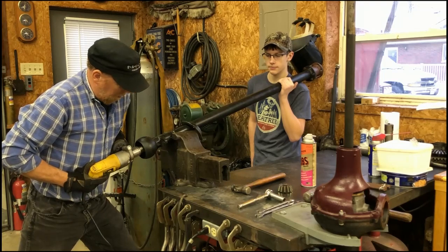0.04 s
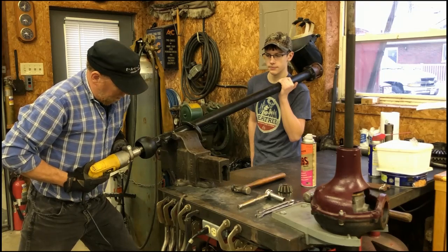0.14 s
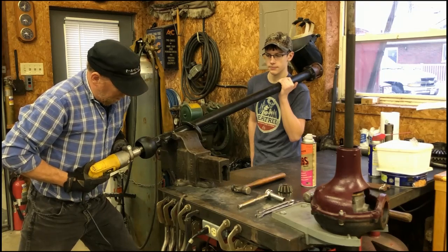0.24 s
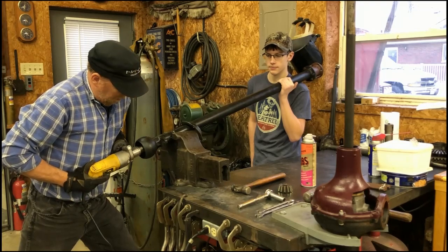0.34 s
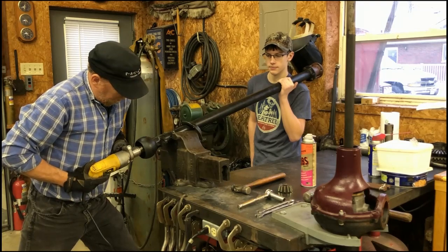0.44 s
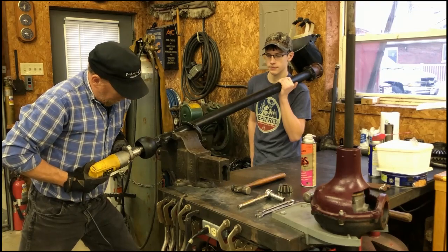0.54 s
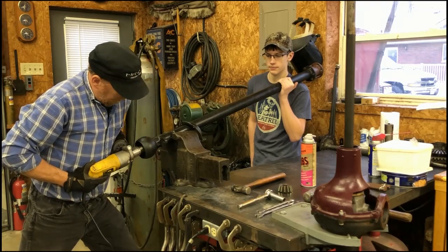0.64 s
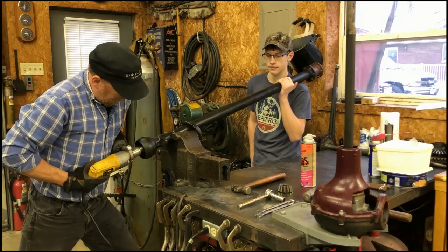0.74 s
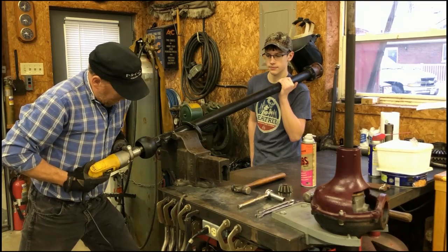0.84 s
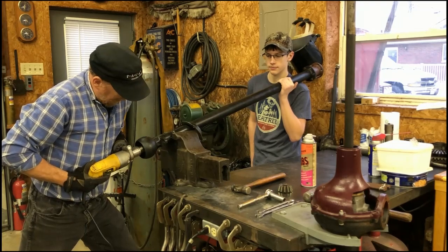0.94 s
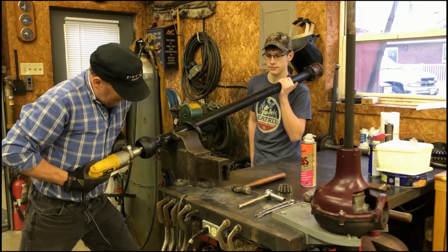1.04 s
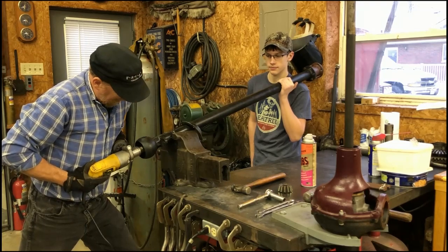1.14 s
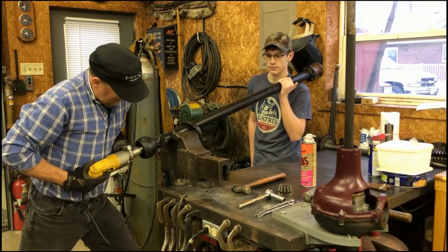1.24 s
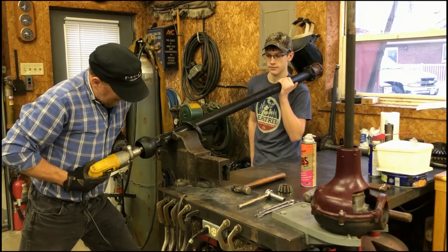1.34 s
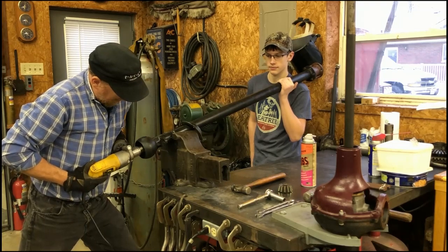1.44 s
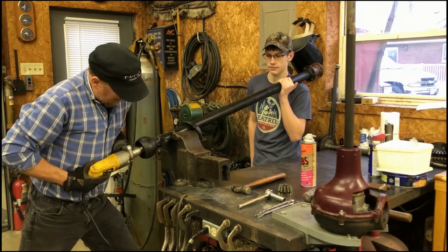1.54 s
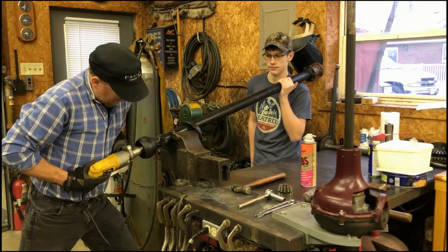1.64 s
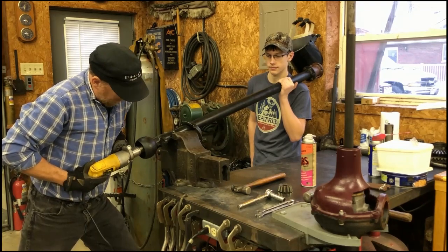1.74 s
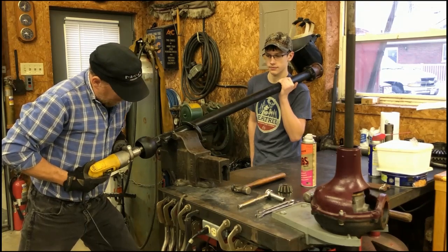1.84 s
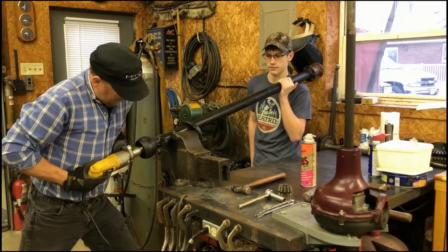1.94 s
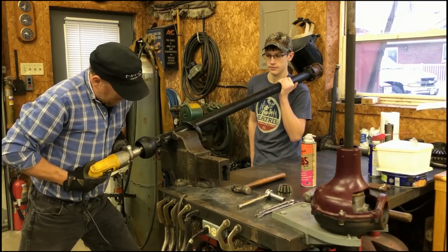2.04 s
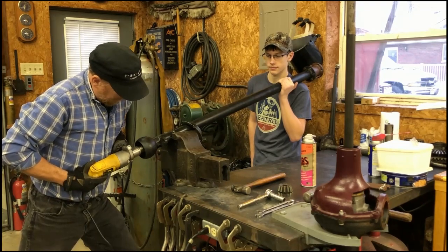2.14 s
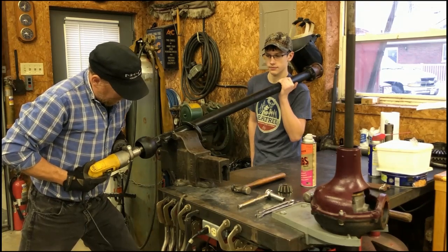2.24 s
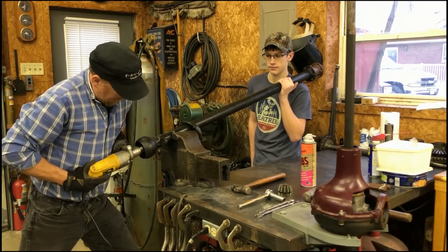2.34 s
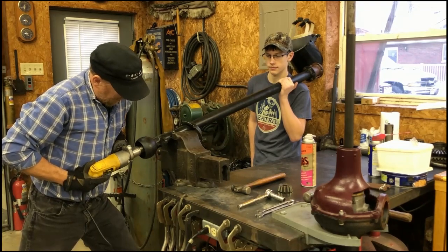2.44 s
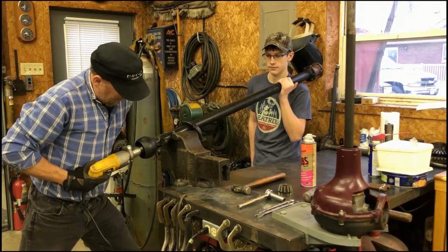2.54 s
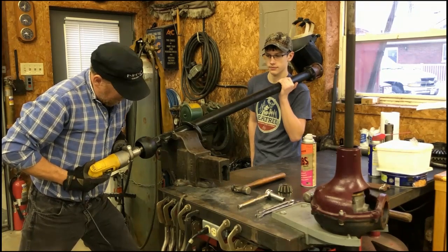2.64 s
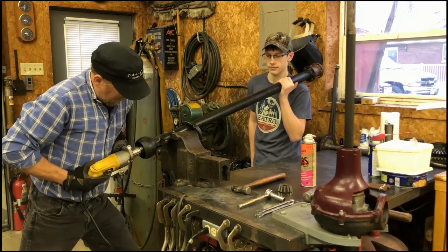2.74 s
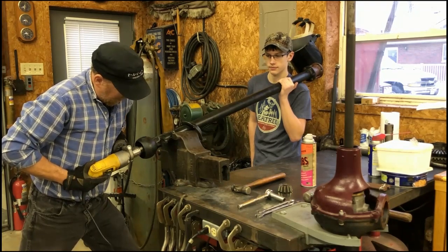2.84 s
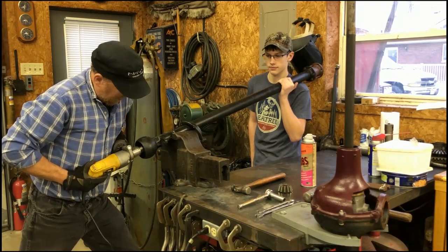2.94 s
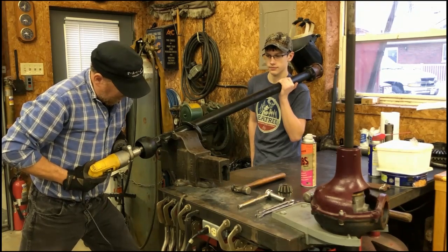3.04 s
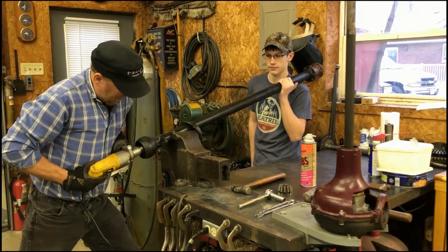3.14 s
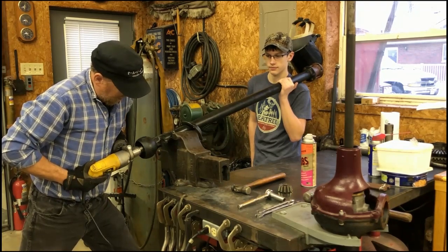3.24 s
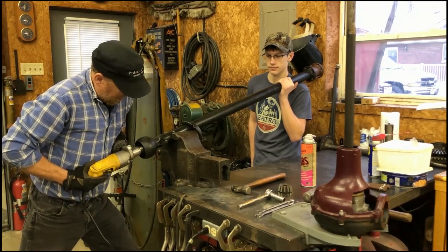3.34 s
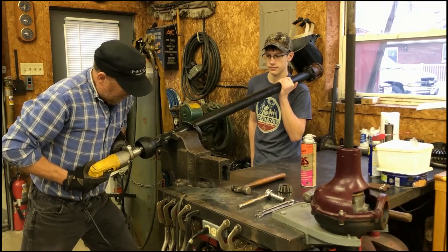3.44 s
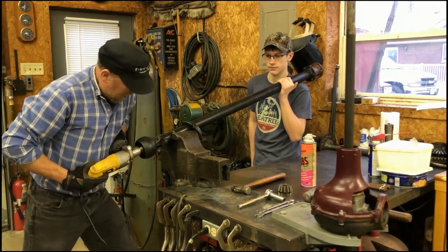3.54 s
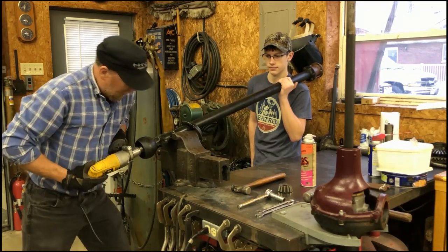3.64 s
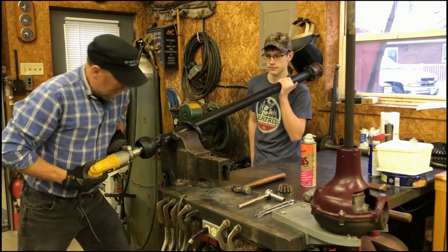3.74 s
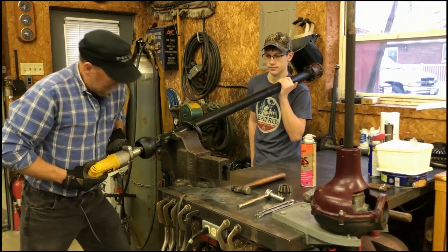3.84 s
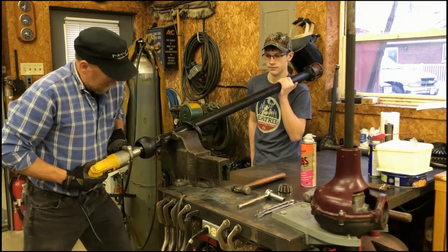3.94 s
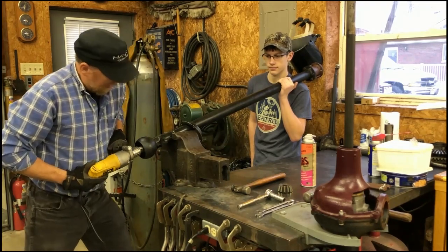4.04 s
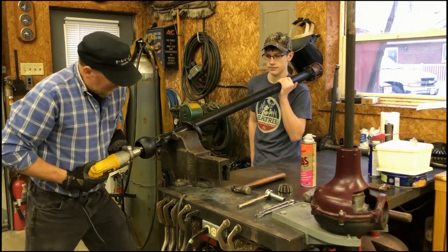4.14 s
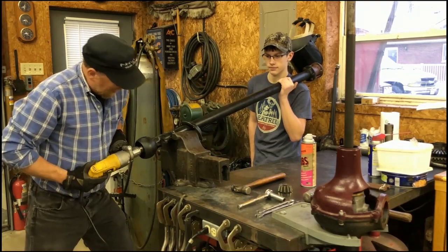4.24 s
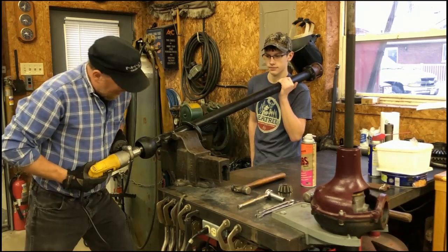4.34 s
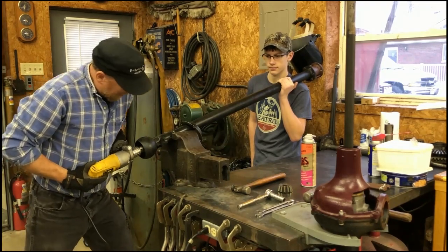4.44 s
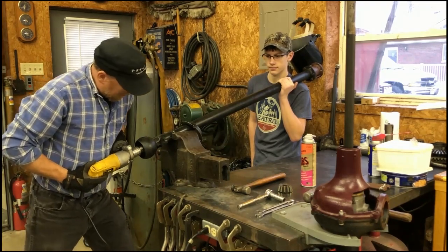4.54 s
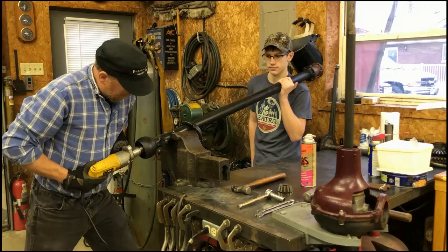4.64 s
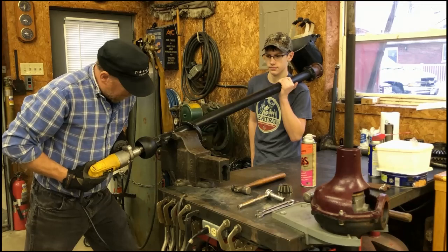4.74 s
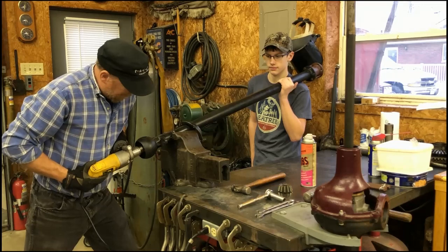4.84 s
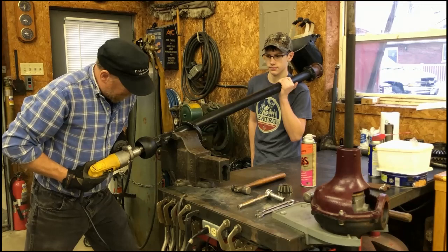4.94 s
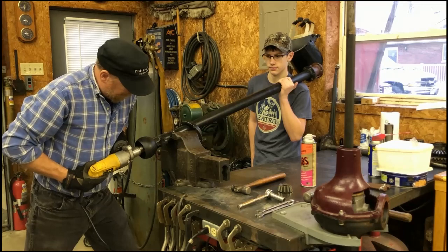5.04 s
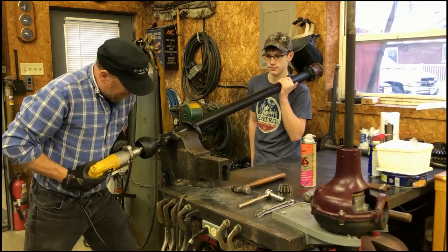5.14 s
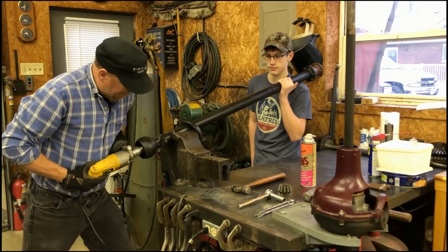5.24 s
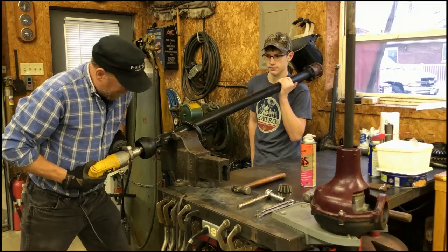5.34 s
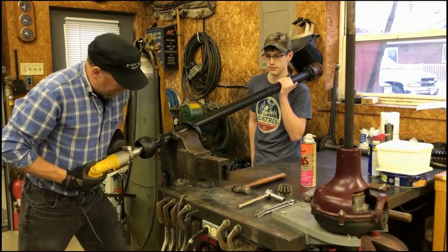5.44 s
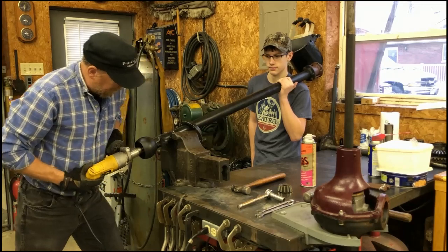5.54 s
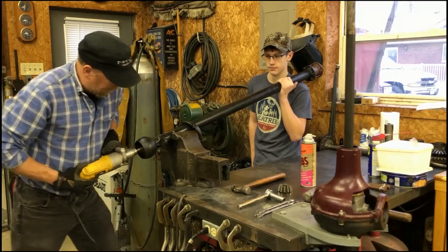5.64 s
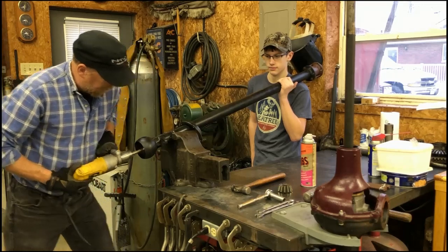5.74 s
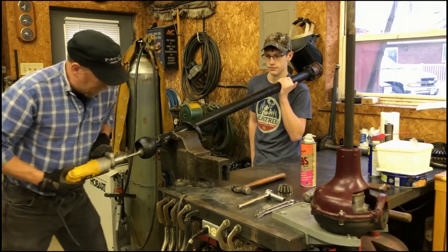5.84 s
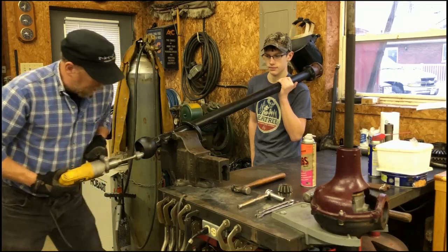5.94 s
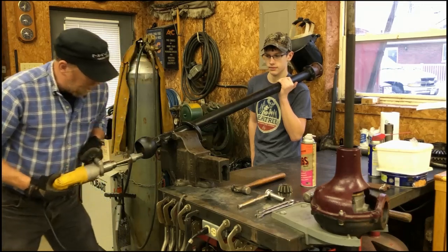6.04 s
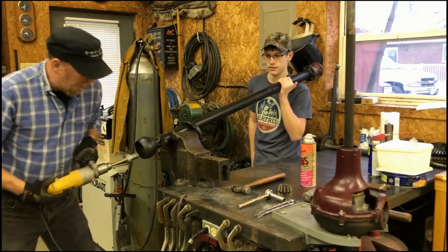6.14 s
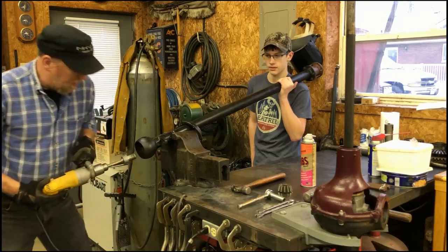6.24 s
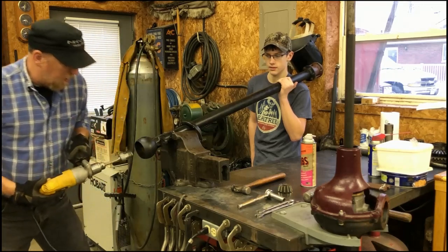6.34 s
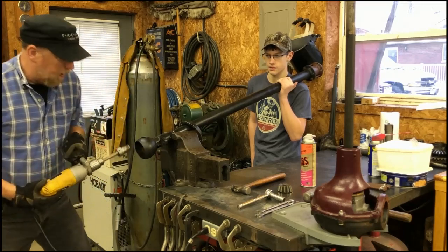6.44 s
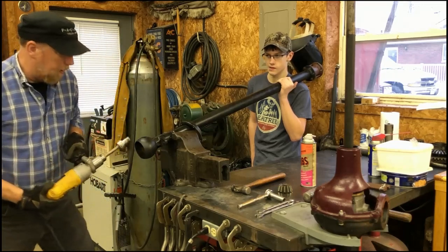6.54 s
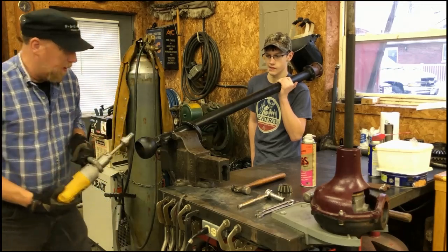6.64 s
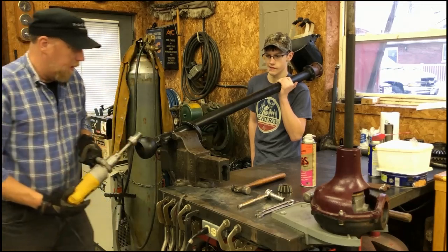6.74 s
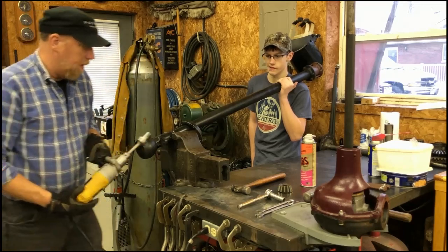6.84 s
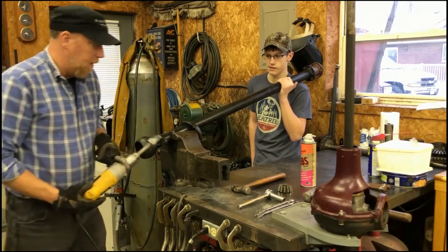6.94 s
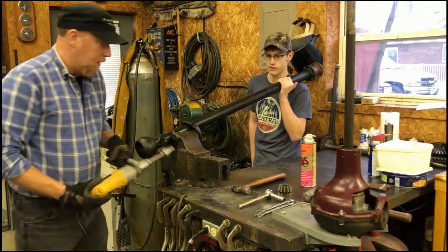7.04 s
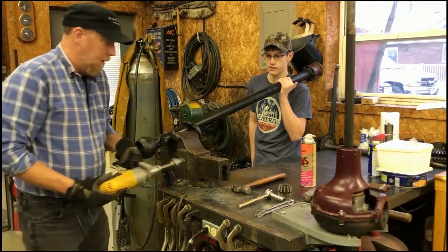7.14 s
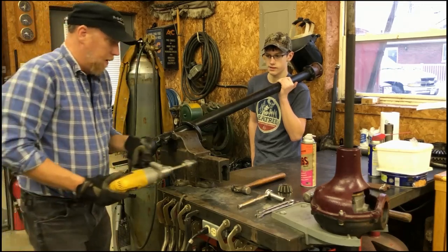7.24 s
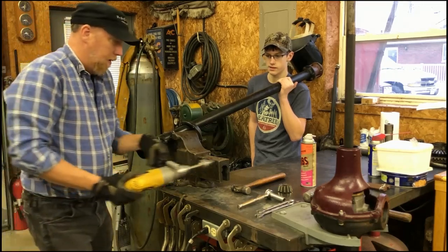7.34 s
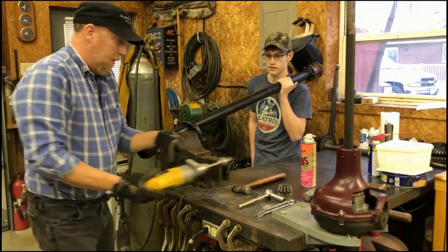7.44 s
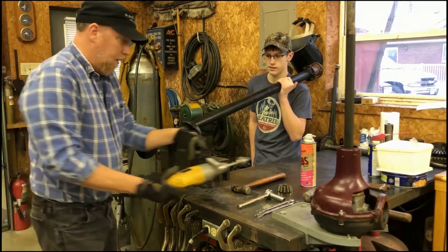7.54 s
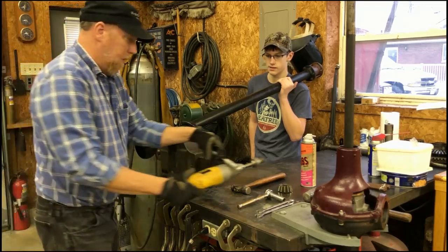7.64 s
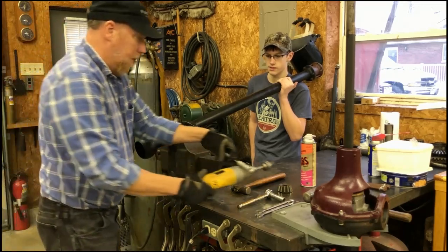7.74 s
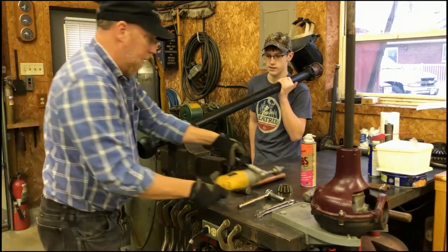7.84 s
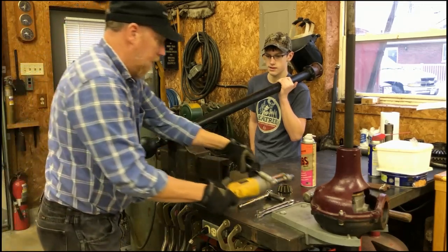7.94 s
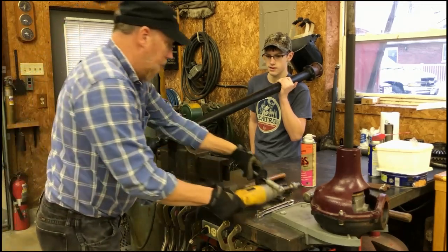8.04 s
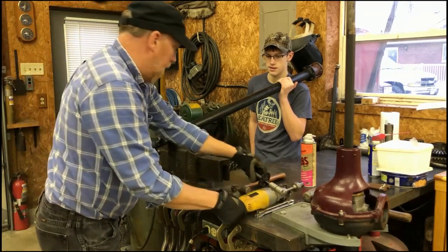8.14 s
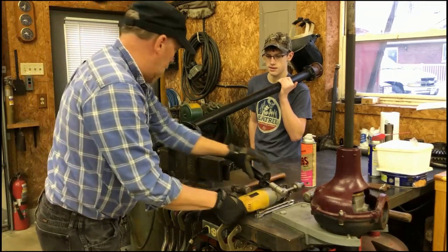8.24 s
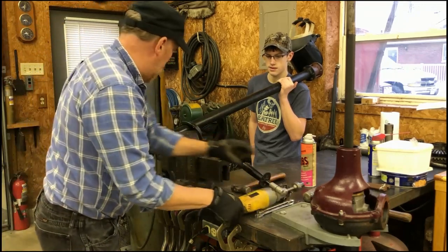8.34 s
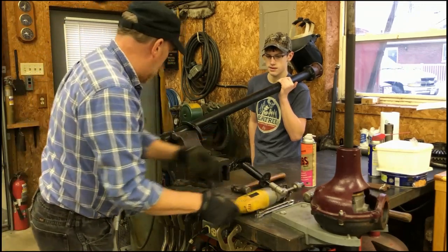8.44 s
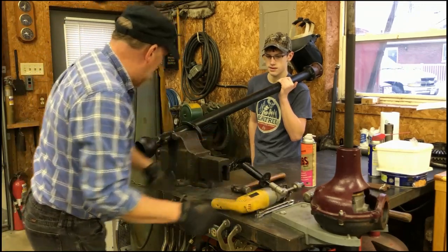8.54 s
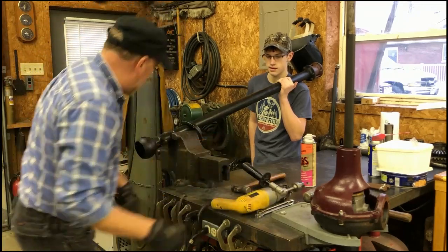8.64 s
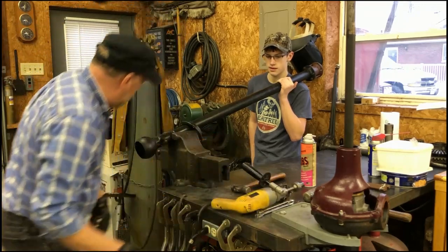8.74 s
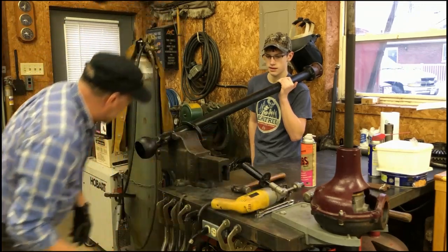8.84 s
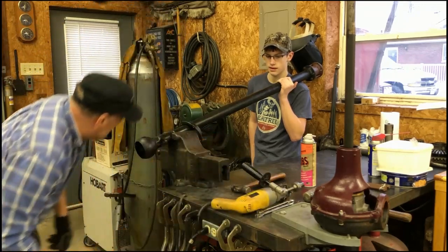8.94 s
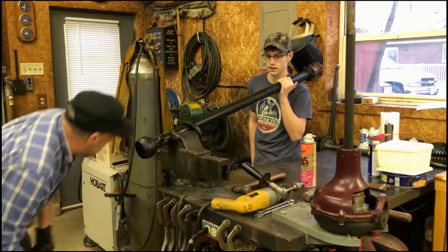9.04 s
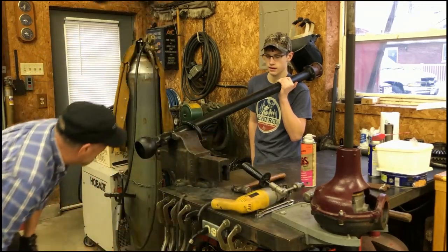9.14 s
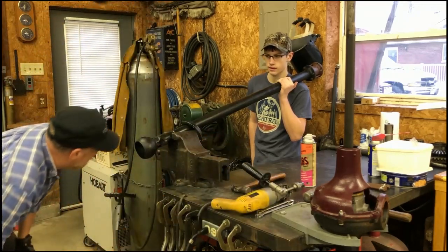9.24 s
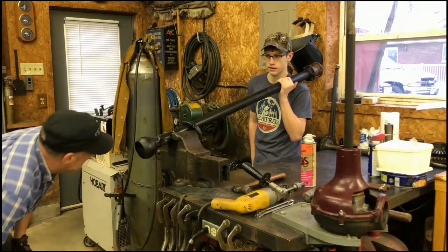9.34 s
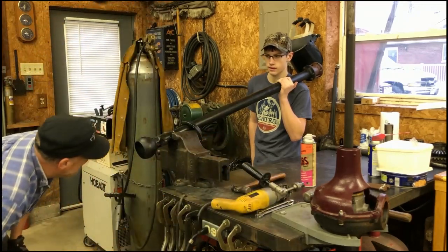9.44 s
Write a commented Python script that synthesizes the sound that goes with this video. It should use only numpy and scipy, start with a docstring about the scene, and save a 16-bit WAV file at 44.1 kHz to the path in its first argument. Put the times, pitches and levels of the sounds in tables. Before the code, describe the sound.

A corded drill runs nearby in a lightly echoing garage, over a faint, steady electrical hum. It whirs in five short bursts, at about 0.1, 0.7, 1.4, 2.1 and 3 seconds, rising quickly in pitch and sagging between pulls. The gears whine and rasp while the cutter chatters in a steel tube with a metallic ring. A longer, fuller grinding cut runs from 4.6 to 5.2 seconds. The cutter then comes out, and the drill coasts down with a fading hiss, stopping around 6.5 seconds. A few light handling clicks and a small clink come between 7.3 and 8 seconds. At 8.2 seconds the drill lands hard on a wooden bench, with a thud and a sharp clank of steel tools that ring on. A brief swish at 9 seconds swells into a dull knock.

```python
"""A corded drill whirs in five short bursts, then a long one, over a low mains hum in a garage.
It turns a cutter in the end of a steel tube held in a vise: the gears whine, the cutter chatters
and the tube rings. The cutter is then drawn out and the drill coasts to rest. After a few light
clicks of handling, the drill is put down hard, so the wooden bench thuds and steel tools ring.
A swish and a dull knock follow."""
import sys
import numpy as np
from scipy import signal
from scipy.fft import rfft, irfft, next_fast_len
from scipy.io import wavfile
from scipy.ndimage import uniform_filter1d, map_coordinates

SR = 44100
rng = np.random.default_rng(int(sys.argv[2]) if len(sys.argv) > 2 else 0)


def generate_wav(sig):
    """Save sig (samples, or channels by samples) to the path in sys.argv[1] as 16-bit PCM at SR."""
    pcm = np.round(np.clip(np.atleast_2d(sig).T, -1, 1) * 32767).astype(np.int16)
    wavfile.write(sys.argv[1], SR, pcm)


N = 418509

# Trigger pulls; the last is the deep cut.
# Each row: start in seconds, end in seconds, speed the motor heads for in turns per second.
TRIGGER_PULLS = [(.1, .24, 388), (.722, .872, 384), (1.385, 1.562, 372), (2.05, 2.365, 372),
                 (2.998, 3.283, 362), (4.628, 5.22, 383)]
# Resonances of the drill's head. Each row: pitch in Hz, width in Hz, relative level in dB.
HEAD_RESONANCES = [(2147, 360, -5), (2364, 152, 0.5), (2790, 310, -0.5), (3127, 27, 3.5), (3287, 15, -1)]


def amp(db):
    """Turn decibels into a number to multiply a sound by."""
    return 10 ** (np.asarray(db) / 20)


def unit(x):
    """Scale a sound so that its average strength (rms) is 1."""
    return x / np.sqrt(np.mean(x ** 2) + 1e-20)


def along(points, hz):
    """Read between rows of (Hz, value), giving every octave the same room."""
    pitches, values = np.transpose(points)
    return np.interp(np.log(hz + 1), np.log(pitches), values)


def curve(points, outside=None):
    """Join rows of (seconds, value) with lines; the end values hold unless outside is given."""
    times, values = np.transpose(points)
    return np.interp(np.arange(N) / SR, times, values, outside, outside)


def wobble(rate):
    """A smooth curve through random values, rate of them each second."""
    return map_coordinates(rng.standard_normal(int(N * rate / SR) + 4), [np.arange(N) * rate / SR])


def filtered(x, response):
    """Multiply each frequency in a sound by response(hz)."""
    size = next_fast_len(len(x) + 8192)
    return irfft(rfft(x, size) * response(np.fft.rfftfreq(size, 1 / SR)), size)[:len(x)]


def coloured(x, spectrum):
    """Shape a sound's tone with rows of (Hz, dB), then scale it to strength 1."""
    return unit(filtered(x, lambda hz: amp(along(spectrum, hz))))


def resonate(x, modes):
    """A shaken object boosts the pitches it likes to ring at; the result has strength 1."""
    def response(hz):
        return sum((-1) ** k * amp(db) * 1j * hz * width / (pitch ** 2 - hz ** 2 + 1j * hz * width)
                   for k, (pitch, width, db) in enumerate(modes))
    return unit(filtered(x, response))


def garage(x, echo_db):
    """The walls add a wash of echoes whose treble dies first; the power stays about the same."""
    # The garage's echo. Each row: frequency in Hz, seconds to fade by 60 dB.
    fade_times = [(100, 0.91), (400, 1), (1500, 1), (3000, 0.96), (5500, 0.74), (8000, 0.47), (12000, 0.35)]
    hz, t, noise = signal.stft(rng.standard_normal(SR), SR, nperseg=256)
    fade = amp(-60 * t / along(fade_times, hz)[:, None])
    _, tail = signal.istft(noise * fade, SR, nperseg=256)
    late_tail = np.pad(tail, (SR // 300, 0)) / np.linalg.norm(tail)
    echo = signal.fftconvolve(x, late_tail)[:N]
    return (x + amp(echo_db) * echo) / np.hypot(1, amp(echo_db))


def motor_speed():
    """Turns per second: each pull spins the motor up, then friction and the cutter brake it."""
    # How hard the cutter is pressed into the tube. Each row: time in seconds, share from 0 to 1.
    pressure = [(3.6, 1), (3.7, .32), (4, .32), (4.6, 1), (5.3, 1), (5.43, 0)]
    start_speed = 52  # turns per second: the motor is already coasting
    friction_brake, cutter_brake = 195, 397  # turns per second lost each second
    spin_up_s, bend = .093, .85  # a bend under 1 gives a quick start and a slow finish
    t = np.arange(N) / SR
    lost = np.cumsum(friction_brake + cutter_brake * curve(pressure)) / SR
    speed = np.maximum(start_speed - lost, 0)
    for on, off, top in TRIGGER_PULLS:
        held_s = np.maximum(np.minimum(t, off) - on, 0)
        driven = top * (1 - np.exp(-(held_s / spin_up_s) ** bend))
        lost_since_release = np.maximum(lost - np.interp(off, t, lost), 0)
        speed = np.maximum(speed, driven - lost_since_release)
    return speed


def lagged(gain, lag_s):
    """Shaking takes a moment to build up and to die away."""
    keep = np.exp(-1 / (lag_s * SR))
    return np.sqrt(signal.lfilter([1 - keep], [1, -keep], gain ** 2))


def drill_gains(speed):
    """Each part's loudness follows the speed, jumps at jolts and changes as the cutter comes out."""
    # Loudness at each speed. Each row: turns per second, then chatter, head ring and rasp in dB.
    levels_by_speed = [(0, -53, -48, -65), (35, -47, -40.5, -52), (83, -46.5, -37, -34),
                       (167, -34.5, -36, -27.5), (297.7, -28, -32, -23), (378, -24.5, -30, -19.5)]
    # The cutter catches on the tube's edge.
    # Each row: time in seconds, extra chatter in dB, extra ring in dB.
    catches = [(1.57, 0.5, 6), (2.355, 2, 6.5), (3.32, 2, 6.5), (4.95, 2.5, 4.5), (5.05, -1, 8),
               (5.34, 3, 3)]
    catch_s, jolt_peak_s = .058, .038
    withdraw_at_s, withdraw_for_s = 5.395, .57
    stall_speed = 6.5  # turns per second; below this the sound fades out
    t = np.arange(N) / SR
    speeds, *levels = np.transpose(levels_by_speed)
    chatter_db, ring_db, rasp_db = [np.interp(speed, speeds, level) for level in levels]
    for at_s, extra_chatter_db, extra_ring_db in catches:
        catch = np.exp(-((t - at_s) / catch_s) ** 2)
        chatter_db += extra_chatter_db * catch
        ring_db += extra_ring_db * catch
    # the gears jolt each time the motor starts
    ages = [np.maximum(t - on, 0) / jolt_peak_s for on, _, _ in TRIGGER_PULLS]
    jolt = sum(age * np.exp(1 - age) for age in ages)
    withdrawn = np.clip((t - withdraw_at_s) / withdraw_for_s, 0, 1)
    turning = np.minimum(speed / stall_speed, 1)
    chatter = lagged(turning * amp(chatter_db - 11 * withdrawn), lag_s=.035)
    ring = lagged(turning * amp(ring_db - 13 * withdrawn), lag_s=.034)
    ring = np.hypot(ring, amp(-30) * jolt)
    rasp = np.hypot(turning * amp(rasp_db - 19.5 * withdrawn), amp(-41) * jolt)
    gear_load = (1 - withdrawn) * rasp
    hiss_db = -27.5 + 31 * np.log10((speed + stall_speed) / speed.max())
    hiss = turning * withdrawn * amp(hiss_db)
    return chatter, ring, rasp, gear_load, hiss


def tones(angle, multiples, rough, flicker_db):
    """Tones of a turning shaft; loose parts make each flare, and smear the higher ones more."""
    return sum(amp(db + flicker_db * wobble(28))
               * np.cos(k * angle + rough * np.sqrt(k / 12) * wobble(160))
               for k, db in multiples)


def motor(pace, angle, gear_load):
    """The gears whine under load, the motor's core growls with the current, and the fan whistles."""
    # In these three, each row: multiple of the motor speed, relative level in dB.
    gear_tones = [(2, -4), (9, -4), (18, -2.5), (27, -2.5), (30, -13), (36, -5)]  # the rotor, the small nine-tooth gear and its bearing
    slot_tones = [(12, -4.5), (24, -12.5)]  # the slots in the motor's spinning core
    fan_tones = [(13, -1.5), (26, -11.5), (39, -14.5)]  # the cooling fan
    # How well the drill's housing gives off sound. Each row: frequency in Hz, gain in dB.
    housing = [(300, -32.5), (540, -3), (690, 3), (900, -29.5), (1600, -12), (2100, -2), (2550, -1.5),
               (2950, -2), (3300, 0.5), (3850, 0.5), (4400, -5.5), (5300, -3), (7000, -1), (10000, -1),
               (15000, -8.5)]
    t = np.arange(N) / SR
    pulled = sum((t > on) * (t < off) * 1. for on, off, _ in TRIGGER_PULLS)
    trigger = uniform_filter1d(pulled, SR // 40)
    # the current pulses twice in each mains cycle and drops near top speed
    mains = np.abs(np.sin(2 * np.pi * 60 * t))
    current = trigger * mains * (1 - .8 * pace ** 8)
    # the small gear wobbles once a turn, which splits its higher tones
    gear_angle = angle + .03 * np.sin(angle)
    gears = (1 - .4 * pace ** 8) * tones(gear_angle, gear_tones, rough=.78, flicker_db=4)
    # the core runs slightly off centre, so its tones swell once a turn
    slots = (1 + .7 * np.cos(angle)) * tones(angle, slot_tones, rough=.7, flicker_db=2)
    whine = amp(-2.5) * gear_load * gears + amp(-12) * current * pace ** 2 * slots
    whine = filtered(whine, lambda hz: amp(along(housing, hz)))
    # the gliding tones flare wherever they cross a resonance of the drill's head
    whine = amp(-1.5) * whine + amp(-9) * whine.std() * resonate(whine, HEAD_RESONANCES)
    fan = amp(-23) * pace ** 10 * tones(angle, fan_tones, rough=.25, flicker_db=5.5)
    # the slots still sing faintly when the motor runs free
    idle_gain = amp(-42.5) * np.minimum(pace / .35, 1) ** 2
    idle = idle_gain * tones(angle, slot_tones, rough=.35, flicker_db=3)
    return garage(whine + fan + idle, echo_db=-7.5)


def scrape(strength, spiky_db):
    """Countless tiny impacts of uneven size, bunched where strength is high."""
    return rng.standard_normal(N) * strength * amp(spiky_db * wobble(700))


def cutter(pace, bite, teeth, chatter_gain, rasp_gain):
    """The cutter's edges bite the tube in turn, so it shakes and rings while the gearbox rasps."""
    # In these three, each row: frequency in Hz, relative level in dB.
    chatter_tone = [(35, -44.5), (75, 3), (130, 0.5), (225, 0), (320, -6.5), (560, 1), (700, 1.5),
                    (850, -1.5), (1400, -4.5), (2100, -22.5), (2900, -25.5)]  # the light cuts
    grind_tone = [(35, -31.5), (62, -1.5), (130, 0), (240, -4.5), (320, -6), (460, 3.5), (700, 1),
                  (1100, 2.5), (1600, -3), (2300, -5), (3000, -44)]  # the deep cut, fuller in the middle
    rasp_tone = [(820, -26.5), (1400, -25.5), (1840, -2), (2370, -22), (2820, -5.5), (4230, -1.5),
                 (4780, -2.5), (5850, -2.5), (6950, -8), (7540, -5.5), (10000, -9.5), (10900, -10),
                 (12800, -4), (15200, -10.5), (15800, -15.5)]  # the gearbox
    # In these two, each row: pitch in Hz, width in Hz, relative level in dB.
    sway_resonances = [(232, 18, -1), (499, 18, -4.5)]  # the tube swaying in the vise
    cutter_resonances = [(3934, 90, -4), (5280, 23, 6), (6915, 48, 1), (8150, 290, -7), (8940, 53, -4.5),
                         (9640, 80, 3.5), (12430, 180, -3), (12500, 160, -13.5)]  # the cutter ringing in the tube
    shaking = scrape(amp(2 * bite), spiky_db=2)
    deep_cut = np.arange(N) / SR > TRIGGER_PULLS[-1][0]
    grind = coloured(shaking, grind_tone)
    light = amp(-2) * coloured(shaking, chatter_tone)
    chatter = chatter_gain * np.where(deep_cut, grind, light)
    sway = amp(-9.5) * chatter_gain * pace ** 3 * resonate(shaking, sway_resonances)
    rasp = amp(-4.67) * coloured(scrape(teeth * amp(2.3 * bite), spiky_db=1.55), rasp_tone)
    edges = amp(-9) * resonate(scrape(amp(5.1 * bite), spiky_db=2.5), cutter_resonances)
    return chatter + sway + rasp_gain * (rasp + edges)


def drill():
    """One motor drives the cutting, the whine and the hiss, so they all follow its speed."""
    # Hiss of the coasting drill. Each row: frequency in Hz, relative level in dB.
    hiss_tone = [(60, -22), (300, -2.5), (400, 0), (1050, 5), (1900, -14.5), (3000, 1.5), (6000, -0.5),
                 (10500, -10), (12600, 0), (15800, -5)]
    speed = motor_speed()
    pace = speed / speed.max()  # 0 at rest, 1 at top speed
    chatter_gain, ring_gain, rasp_gain, gear_load, hiss_gain = drill_gains(speed)
    angle = 2 * np.pi * np.cumsum(speed * (1 + .00296 * wobble(30))) / SR
    # the geared-down cutter bites unevenly, several motor turns apart, and harder at speed
    bite = np.sqrt(pace) * np.cos(.14 * angle + 2 * wobble(40))
    teeth = 1 + .12 * np.cos(9 * angle)  # nine gear teeth pass in each turn
    cutting = cutter(pace, bite, teeth, chatter_gain, rasp_gain)
    # out of the tube, the motor's brushes and the idling gearbox hiss on
    hiss = hiss_gain * coloured(scrape(teeth, spiky_db=1.7), hiss_tone)
    # rubbing inside the head keeps it ringing down to the last turn
    ring = ring_gain * resonate(scrape(amp(1.6 * bite), spiky_db=2.5), HEAD_RESONANCES)
    return cutting + hiss + ring + motor(pace, angle, gear_load)


def mains_hum():
    """The mains supply hums, wavering slightly, over the faint noise of still air."""
    # Tones of the hum. Each row: pitch in Hz, average (rms) level in dB.
    hum_tones = [(59.5, -63), (360, -64), (479.5, -78), (598, -70), (720, -82), (1459, -73.5)]
    # The air in the garage. Each row: frequency in Hz, relative level in dB.
    air_tone = [(25, -29), (58, -6), (90, -5.5), (250, -12), (400, -12), (900, -18), (1500, -17),
                (2000, -23.5), (4000, -26.5), (8000, -37), (15800, -43.5)]
    t = np.arange(N) / SR
    hum = sum(amp(db) * np.sqrt(2) * np.sin(2 * np.pi * hz * t + .35 * wobble(6))
              for hz, db in hum_tones)
    return hum + amp(-59) * coloured(rng.standard_normal(N), air_tone)


def ringing(modes):
    """A struck object rings: one second of fading tones, at new strengths for every blow."""
    t = np.arange(SR) / SR
    return sum(amp(db + 2 * rng.standard_normal() - 60 * t / fade_s)
               * np.sin(2 * np.pi * hz * t) * rng.choice([-1, 1])
               for hz, db, fade_s in modes)


def burst(spectrum, fade_s):
    """The noise of one blow, falling by 60 dB every fade_s seconds."""
    t = np.arange(SR) / SR
    return coloured(rng.standard_normal(SR), spectrum) * amp(-60 * t / fade_s)


def knocks():
    """Each knock is a wooden thud, a steel clank that rings on, and a bright tick."""
    # Handling the drill and tools, and the click of the trigger at 4.627 s; the loudest knocks are the drill
    # landing on the bench. Each row: start in seconds, then relative levels of the clank, thud and tick in dB.
    blows = [(4.321, -47.5, -69.5, -62), (4.627, -33, -50, -44.5), (7.333, -66, -53, -76),
             (7.609, -55, -65.5, -60), (7.699, -67, -46.5, -80.5), (7.883, -41.5, -54, -49.5),
             (7.956, -49, -41, -79.5), (8.166, -7, -31, -23), (8.186, -12.5, -16.5, -18),
             (8.202, -15, -17, -28), (8.79, -53, -46.5, -56.5), (9.133, -33.5, -20, -42)]
    # The three noises of a blow. Each row: frequency in Hz, relative level in dB.
    clank_tone = [(250, -24), (700, -4.5), (1050, 0.5), (2200, 0.5), (3400, 3.5), (5000, 0), (8000, -21.5),
                  (15000, -33.5)]
    thud_tone = [(35, -37), (65, -22), (110, -16.5), (200, -3), (400, -1.5), (1050, -7), (1800, -5.5),
                 (4000, -34.5)]
    tick_tone = [(2500, -28.5), (6000, 0.5), (9500, -3), (12500, -10.5), (15500, -9.5)]
    # In these three, each row: pitch in Hz, relative level in dB, seconds to fade by 60 dB.
    steel_ring = [(191, -5.5, 1.7), (457, -10.5, .8), (1060, 9.5, 0.48), (1540, -10.5, 0.31),
                  (2820, -14, 1), (3400, -11.5, .65), (3330, 0.5, .7), (4300, -2.5, .5), (4740, -6, .5),
                  (5370, -10.5, 0.71), (7130, -9.5, .33)]  # the steel tools on the bench
    wood_ring = [(64, -16, 0.19), (140, -1.5, 0.058), (205, -4.5, 0.043), (273, -0.5, 0.081)]  # the wooden bench
    clink_ring = [(1610, 0.5, 0.16), (4400, 0, 0.13), (4970, -2, .15), (8900, -1, 0.13), (10000, -9, .13)]  # the cutter's tip touching a tool
    clink_at_s = 7.885
    track = np.zeros(N + SR)
    for start_s, clank_db, thud_db, tick_db in blows:
        clank = burst(clank_tone, fade_s=.15) + amp(-31.5) * ringing(steel_ring)
        thud = burst(thud_tone, fade_s=.087) + amp(-12) * ringing(wood_ring)
        tick = burst(tick_tone, fade_s=.18)
        knock = amp(clank_db) * clank + amp(thud_db - 2) * thud + amp(tick_db + 3) * tick
        track[round(start_s * SR):][:SR] += knock
    track[round(clink_at_s * SR):][:SR] += amp(-45) * ringing(clink_ring)
    return garage(track[:N], echo_db=-5.5)


def swish():
    """Something brushes past with a short hiss that swells into the last knock."""
    # The rise and fall of the swish. Each row: time in seconds, level in dB.
    swell = [(8.95, -70), (9.03, -51), (9.1, -42), (9.17, -43.5), (9.22, -55), (9.32, -77.5)]
    # Its hiss. Each row: frequency in Hz, relative level in dB.
    swish_tone = [(530, -31), (900, -3), (1140, -11), (1680, -2), (2430, -12.5), (3130, -5.5), (4280, -6),
                  (15800, -17)]
    return amp(curve(swell, outside=-120)) * coloured(rng.standard_normal(N), swish_tone)


def scene():
    """Add all the sounds together, the same on the left and the right."""
    return np.tile(drill() + mains_hum() + knocks() + swish(), (2, 1))


def record(dry):
    """Round off the highest peaks and cut away the very top of the treble."""
    ceiling, top_hz = .92, 15900
    rounded = dry / (1 + np.abs(dry / ceiling) ** 6) ** (1 / 6)
    return np.array([filtered(channel, lambda hz: 1 / np.hypot(1, (hz / top_hz) ** 150))
                     for channel in rounded])


dry = scene()
out = record(dry)
generate_wav(out)
```